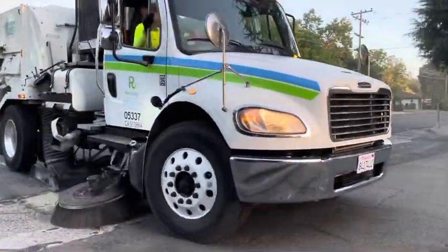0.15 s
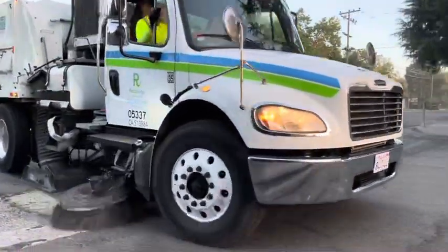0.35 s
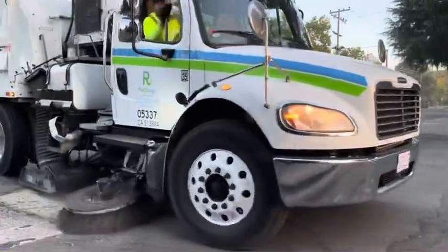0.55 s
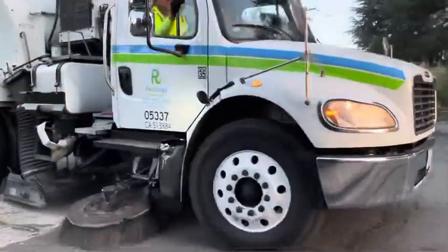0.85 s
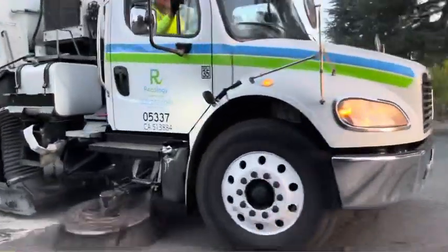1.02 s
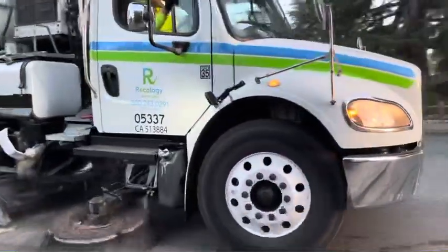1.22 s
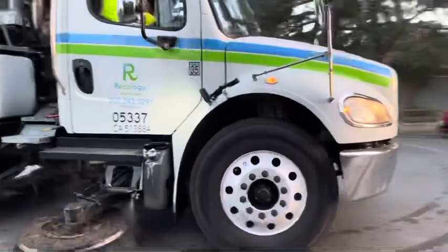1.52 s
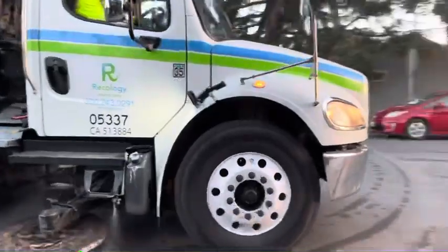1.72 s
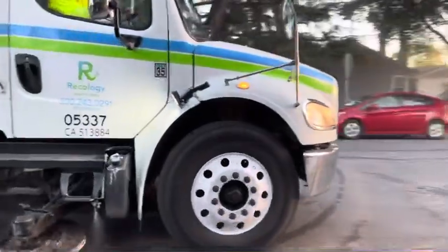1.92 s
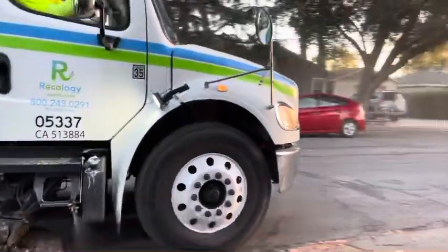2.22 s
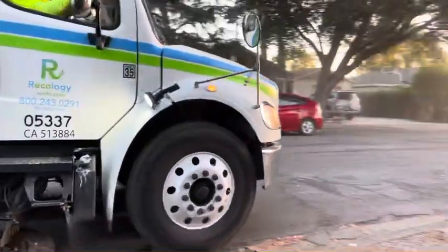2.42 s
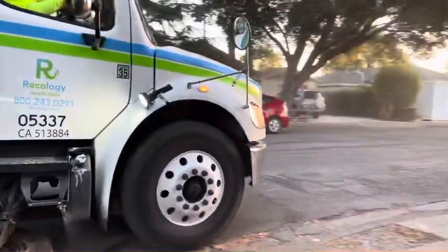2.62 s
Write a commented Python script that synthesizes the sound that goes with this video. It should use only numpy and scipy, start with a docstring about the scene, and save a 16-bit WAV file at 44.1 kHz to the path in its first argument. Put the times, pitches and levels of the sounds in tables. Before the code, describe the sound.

A street sweeper truck passes slowly and very close outdoors. From 0 to 1 s a steady, slightly wavering low fan hum near 208 Hz dominates, with engine rumble, brief low surges, rushing air, gutter brush scrubbing and bright hiss. From about 1.1 to 1.5 s the hum falls sharply; the stereo image shifts until 2 s. Quieter rumble, airy roar and scrubbing continue to 2.75 s without stopping.

```python
"""A street sweeper creeps past a phone, heard close through two microphone ports with a frequency-dependent lead.
At first the suction fan's blade tone and its multiples (sines) swell over engine rumble, body drone, air roar,
gutter brush and bright hiss (shaped noise), and low engine surges (sines in bell curves) rise in the first second.
After about a second the fan fades as the cab screens it; from 1.33 to 2.02 s the truck swings to its late bearing,
the lead between the ports shifts and the brush turns away. Low and quieter noise carries on to the end."""
import sys
import numpy as np
from scipy import signal
from scipy.fft import rfft, irfft, next_fast_len
from scipy.io import wavfile
from scipy.ndimage import uniform_filter1d, map_coordinates

SR = 44100
rng = np.random.default_rng(int(sys.argv[2]) if len(sys.argv) > 2 else 0)


def log_audio(samples):
    """Write samples as a 16-bit WAV file to the path given in sys.argv[1]."""
    # one column per channel
    frames = np.atleast_2d(samples).T
    # limit to full scale, then quantise
    limited = np.clip(frames, -1, 1)
    pcm = np.round(limited * 32767).astype(np.int16)
    wavfile.write(sys.argv[1], SR, pcm)


N = 121275  # samples, 2.75 s

# Layer levels before trims: (time [s], rumble [dB], drone [dB], roar [dB], brush [dB], hiss [dB], fizz [dB])
LAYER_LEVELS = [(0, -22.5, -32.5, -28, -29.5, -38.5, -33), (.15, -25.5, -29, -29, -29, -33.5, -31),
                (.35, -23, -28, -26.5, -28.5, -32, -29.5), (.55, -22.5, -25, -27.5, -27, -31.5, -27.5),
                (.68, -24, -26.5, -26.5, -28, -29.5, -29), (.8, -22, -28.5, -26, -27, -31, -28.5),
                (.95, -23, -28, -26.5, -28, -29.5, -29), (1.15, -25.5, -29, -28.5, -28.5, -32.5, -29.5),
                (1.32, -26, -29, -27, -27.5, -29, -29.5), (1.5, -27, -30.5, -28.5, -28, -31, -29.5),
                (1.72, -27.5, -32.5, -31, -28.5, -31.5, -29), (1.95, -29.5, -33, -30.5, -29.5, -32, -31),
                (2.2, -30.5, -35, -30, -31.5, -33, -31), (2.4, -31.5, -32, -31, -31, -32.5, -33),
                (2.55, -29, -34.5, -31, -30.5, -34, -30), (2.75, -33, -34, -30.5, -31, -32.5, -33.5)]
# Added to those levels, dB
RUMBLE_TRIM_DB, DRONE_TRIM_DB, ROAR_TRIM_DB = -1.5, 2, -0.47
BRUSH_TRIM_DB, HISS_TRIM_DB, FIZZ_TRIM_DB = 2, 5.5, 1

# Noise colours, one per layer; the brush has an early and a late one: (frequency [Hz], relative density [dB])
FIZZ_SPECTRUM = [(9000, -28), (11500, -4.5), (13000, 0), (14300, -0.5), (15200, -2), (16000, -11)]
HISS_SPECTRUM = [(5200, -34), (6100, -14), (6700, -8.5), (7100, -3.5), (8500, 0), (9300, -2), (11000, -2.5),
                 (12500, -7), (14500, -28)]
ROAR_SPECTRUM = [(300, -17.5), (480, 0.5), (680, -3), (900, -2), (1200, 1.5), (1340, 0), (1450, -13),
                 (2000, -22)]
DRONE_SPECTRUM = [(150, -30), (215, -0.5), (275, -0.5), (320, -3.5), (360, -3), (470, -5.5), (560, -18.5),
                  (800, -51)]
RUMBLE_SPECTRUM = [(30, -5), (46, -4), (70, -2.5), (100, -3.5), (145, 0.5), (180, -2.5), (230, -18),
                   (320, -35)]
BRUSH_EARLY_SPECTRUM = [(1000, -32), (1500, -2), (2100, 0), (2600, -3.5), (3400, -1), (4500, 0),
                        (5250, -0.5), (5500, -10), (6300, -4.5), (6800, -15), (8000, -45)]
BRUSH_LATE_SPECTRUM = [(1000, -23), (1500, -1.5), (2200, -1.5), (2600, 0), (3100, -1), (4500, -0.5),
                       (5250, -2.5), (5500, -8), (6300, -4.5), (6800, -15), (8000, -41)]

# Engine's low orders: (frequency [Hz], level at full rumble [dB])
FIRING_ORDERS = [(49, -37), (96, -33), (140, -38.5), (277, -42), (357, -38)]
# Low tones that swell up briefly: (time of peak [s], length [s], frequency [Hz], level [dB])
ENGINE_SURGES = [(0.312, 0.19, 141, -32), (0.578, 0.35, 357.8, -30.5), (0.776, 0.17, 125, -26.5),
                 (.8, 0.077, 96.2, -29), (1.003, 0.17, 148, -29.5)]
FIRING_DRIFT_RAD, FIRING_FLUTTER_DB = 1.1, 1

# Fan: (time [s], blade tone level [dB], 2nd multiple [dB], 3rd [dB], 4th [dB], 5th [dB])
FAN_LEVELS = [(0, -17, -31, -29.5, -47, -40), (.1, -17, -37, -34.5, -44, -45),
              (.22, -15, -35, -33, -45, -38), (.4, -13, -28, -36, -52, -46),
              (.55, -13.5, -29, -48, -41, -38), (.68, -13.5, -32, -48, -36, -31.5),
              (.82, -14, -33, -43, -40, -37.5), (.97, -17, -30.5, -41, -45, -39.5),
              (1.12, -16.5, -39, -37, -44, -51), (1.28, -21, -55, -45, -46, -55),
              (1.43, -26, -31.5, -40, -50, -47), (1.6, -24.5, -30.5, -43, -61, -47),
              (1.75, -28.5, -35.5, -52, -49, -49), (2.0, -28, -31, -51, -59, -41),
              (2.3, -29, -29.5, -50, -55, -44), (2.5, -28, -31, -48, -55, -47),
              (2.75, -24, -34, -40, -46, -55)]
# Left over right for the blade tone and each multiple: (balance [dB])
FAN_BALANCE_DB = [1.4, 5.4, 2.3, 1, 1.8]
BLADE_HZ = 208.43
WAVER_RAD, FLUTTER_DB, ROUGH_RAD = 0.07, .5, 0.067

# Noise balance at the phone: (frequency [Hz], left over right [dB])
NOISE_BALANCE = [(50, 0), (200, 0.5), (400, 2), (800, 3.5), (1400, -0.4), (2800, -1.5), (5000, 1),
                 (8000, 0)]
# The two ports from low to high frequency, at early and late bearing; likeness 1 means one shared signal:
# (frequency [Hz], early left lead [rad], late left lead [rad], early likeness [0-1], late likeness [0-1])
PORTS_LOW = [(40, 0.5, .1, 0.99, .99), (110, 0, 0.25, 1, 0.98), (210, 0.2, 0.7, 0.87, 0.89),
             (700, 0.43, 0.93, 0.94, 0.91), (1220, .5, 1.1, 0.8, 0.69), (1600, 0.4, 1.7, 0.78, 0.74),
             (2270, 1, 2.27, 0.82, 0.67), (2610, 3, 4.3, 0.84, 0.65), (2700, 3.5, 6.3, 0.44, 0.45),
             (3500, 5.5, 7.2, 0.38, 0.57), (4070, 6, 7, 0.87, 0.82), (4530, 6, 7.36, 1, 0.83),
             (5190, 8, 8.3, 1, 0.53), (5550, 6, 4.3, 0.74, .2), (6050, 8, 4, 0.67, .25),
             (6350, 8, 5.1, 1, .45), (6960, 4.5, 5.4, 0.26, 0.39), (7430, 3.5, 3.7, 0.76, 0.42)]
PORTS_OPPOSED = [(7680, np.pi, np.pi, 1, 1), (9560, np.pi, np.pi, 1, 1)]
PORTS_HIGH_BAND = [(9810, 2.4, 2.04, 0.89, 1), (9960, 2.03, 3.9, 0.99, 0.91),
                   (10880, 2.05, 1.73, 0.4, 0.58), (11750, 1.15, 0.83, 0.8, .66), (12100, .3, .3, 1, 0.97)]
PORTS_IN_STEP = [(12700, 0, 0, 1, 1)]
# The truck swings from early to late bearing: (start [s], end [s])
TURN_TIMES = (1.33, 2.02)

TOP_HZ = 15760  # band limit
BASS_CUT_HZ, BASS_CUT_ORDER, BASS_FLOOR_DB = 44, 14, -23  # microphone's bass cut


def amp(db):
    """Amplitude ratio of a level in dB."""
    return 10 ** (np.asarray(db) / 20)


def unit(x):
    """Scale to an rms of 1."""
    return x / np.sqrt(np.mean(x ** 2) + 1e-20)


def along(points, hz):
    """Each column after the frequency, read on a log axis."""
    f, *columns = np.transpose(points)
    return [np.interp(np.log(hz + 1), np.log(f + 1), column) for column in columns]


def curves(rows):
    """One value per sample for each column after the time."""
    s, *columns = np.transpose(rows)
    return [np.interp(np.arange(N) / SR, s, column) for column in columns]


def wobble(rate):
    """A smooth random curve through `rate` knots a second."""
    knots = rng.standard_normal(int(N * rate / SR) + 4)
    return map_coordinates(knots, [np.arange(N) * rate / SR])


def port_relation(hz, s):
    """Left port's phase lead and the ports' likeness, moving from early to late bearing with the turn."""
    points = PORTS_LOW + PORTS_OPPOSED + PORTS_HIGH_BAND + PORTS_IN_STEP
    columns = along(points, hz)
    lead0, lead1, like0, like1 = [np.asarray(column)[..., None] for column in columns]
    turn = np.interp(s, TURN_TIMES, [0, 1])
    lead = lead0 + turn * (lead1 - lead0)
    likeness = np.clip(like0 + turn * (like1 - like0), 0, 1)
    return lead, likeness


def rush(spectrum, patchy_db):
    """Noise of rms 1, coloured and patchy in time and frequency, as the two ports hear it."""
    hz, s, z = signal.stft(rng.standard_normal((2, N)), SR, nperseg=2048, noverlap=1536)
    patches = rng.standard_normal(z.shape[1:])
    patches = uniform_filter1d(patches, size=16, axis=0)  # across frequency
    patches = uniform_filter1d(patches, size=4, axis=1)  # across time
    ends_added = [(1, spectrum[0][1] - 12)] + spectrum + [(SR / 2, -120)]
    colour_db = along(ends_added, hz)[0][:, None]
    gain = amp(colour_db + patchy_db * unit(patches))

    lead, likeness = port_relation(hz, s)
    angle = np.arccos(likeness) / 2  # mixes two noises so the ports correlate by the likeness
    shared, apart = np.cos(angle) * z[0], np.sin(angle) * z[1]
    balance_db = along(NOISE_BALANCE, hz)[0][:, None]
    tilt = amp(balance_db / 2) * np.exp(.5j * lead)  # half to each side
    pair = np.array([(shared + apart) * tilt, (shared - apart) / tilt])
    noise = signal.istft(gain * pair, SR, nperseg=2048, noverlap=1536)[1]
    return unit(noise[:, :N])


def tone(hz, phase, level_db, balance_db):
    """One sine at both ports, its lead and balance split evenly; the level is rms."""
    lead = port_relation(hz, np.arange(N) / SR)[0]
    side = np.array([[.5], [-.5]])
    return np.sqrt(2) * amp(level_db + balance_db * side) * np.sin(phase + side * lead)


def upper_hiss(level_db, gust_db):
    """The topmost fizz of the air: noise that gusts and flickers."""
    return amp(level_db + FIZZ_TRIM_DB + gust_db + .35 * wobble(15)) * rush(FIZZ_SPECTRUM, patchy_db=2.7)


def lower_hiss(level_db, gust_db):
    """Bright hiss below the fizz: noise on the same gusts with its own flicker."""
    return amp(level_db + HISS_TRIM_DB + gust_db + 0.35 * wobble(20)) * rush(HISS_SPECTRUM, patchy_db=2.03)


def air_roar(level_db):
    """Mid-band noise of rushing air with a slight unsteadiness."""
    return amp(level_db + ROAR_TRIM_DB + 0.18 * wobble(8.5)) * rush(ROAR_SPECTRUM, patchy_db=1.42)


def body_drone(level_db):
    """The truck body's drone: noise in a band above the engine rumble."""
    return amp(level_db + DRONE_TRIM_DB) * rush(DRONE_SPECTRUM, patchy_db=0.5)


def engine(level_db):
    """Low rumble noise, firing orders whose phase drifts and level flutters, and brief bell-shaped surges."""
    t = np.arange(N) / SR
    below_full_db = level_db - level_db.max()
    sound = amp(level_db + RUMBLE_TRIM_DB) * rush(RUMBLE_SPECTRUM, patchy_db=.6)
    for hz, db in FIRING_ORDERS:
        phase = 2 * np.pi * hz * t + FIRING_DRIFT_RAD * wobble(8)
        order_db = db + below_full_db + FIRING_FLUTTER_DB * wobble(7.07)
        sound = sound + tone(hz, phase, order_db, 0)
    for peak, length, hz, db in ENGINE_SURGES:
        swell = np.exp(-(2 * (t - peak) / length) ** 2)
        phase = 2 * np.pi * hz * t + .5 * wobble(8.2)
        sound = sound + swell * tone(hz, phase, db, 0)
    return sound


def gutter_brush(level_db, gust_db):
    """Scrubbing noise that crossfades at equal power to its late colour as the truck turns the brush away."""
    away = np.interp(np.arange(N) / SR, TURN_TIMES, [0, np.pi / 2])
    early = np.cos(away) * rush(BRUSH_EARLY_SPECTRUM, patchy_db=1.8)
    late = np.sin(away) * rush(BRUSH_LATE_SPECTRUM, patchy_db=.9)
    return amp(level_db + BRUSH_TRIM_DB + 0.46 * gust_db + 0.24 * wobble(12.6)) * (early + late)


def suction_fan():
    """Blade tone and multiples share the shaft's waver; each flutters and roughens on its own."""
    shaft_phase = 2 * np.pi * BLADE_HZ * np.arange(N) / SR + WAVER_RAD * wobble(5.93)
    sound = 0
    for k, db, balance_db in zip(range(1, 6), curves(FAN_LEVELS), FAN_BALANCE_DB):
        unsteady = np.sqrt(k)  # higher multiples are less steady
        start = 2 * np.pi * rng.random()
        phase = k * shaft_phase + unsteady * ROUGH_RAD * wobble(25.06) + start
        level_db = db + unsteady * FLUTTER_DB * wobble(22.03)
        sound = sound + tone(k * BLADE_HZ, phase, level_db, balance_db)
    return sound


def scene():
    """All layers of the passing sweeper; hisses and brush share one gust curve."""
    rumble_db, drone_db, roar_db, brush_db, hiss_db, fizz_db = curves(LAYER_LEVELS)
    gust_db = .5 * wobble(5.15)
    air = upper_hiss(fizz_db, gust_db) + lower_hiss(hiss_db, gust_db) + air_roar(roar_db)
    truck = body_drone(drone_db) + engine(rumble_db)
    return air + truck + gutter_brush(brush_db, gust_db) + suction_fan()


def record(dry):
    """The phone's microphone: a steep bass cut down to a floor, and nothing from the band limit up."""
    m = next_fast_len(N + 8192)
    hz = np.fft.rfftfreq(m, 1 / SR)
    cut = 1 / np.sqrt(1 + (BASS_CUT_HZ / (hz + 1)) ** (2 * BASS_CUT_ORDER))
    bass = np.maximum(amp(BASS_FLOOR_DB), cut)
    return irfft(rfft(dry, m) * (hz < TOP_HZ) * bass, m)[..., :N]


dry = scene()
out = record(dry)
log_audio(out)
```